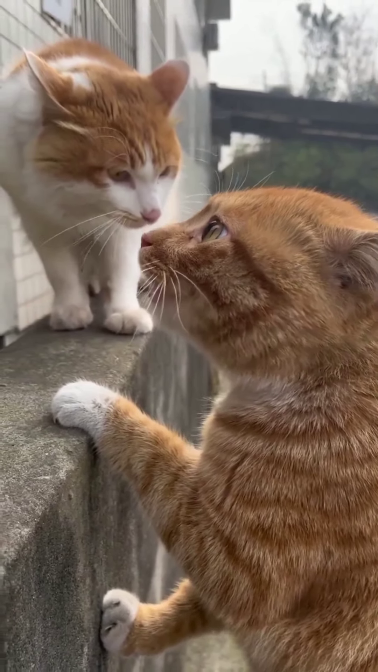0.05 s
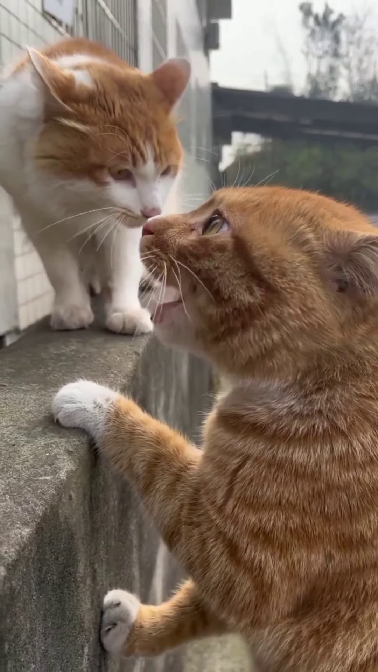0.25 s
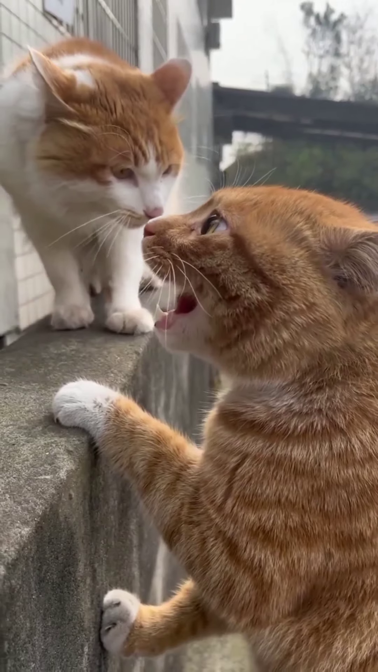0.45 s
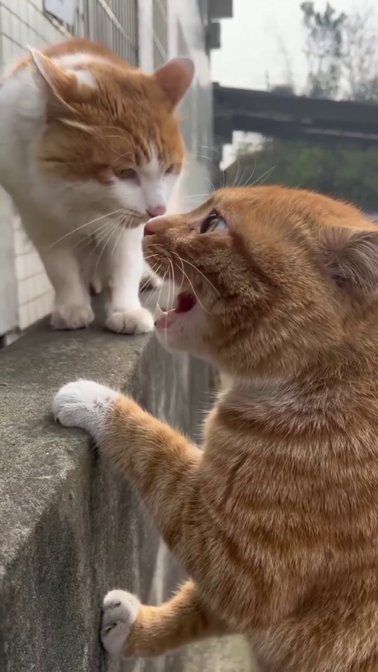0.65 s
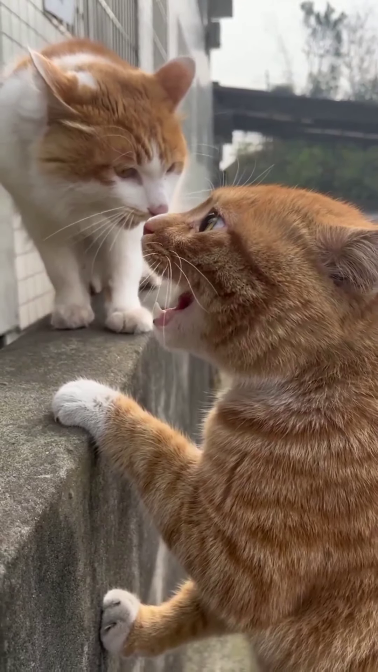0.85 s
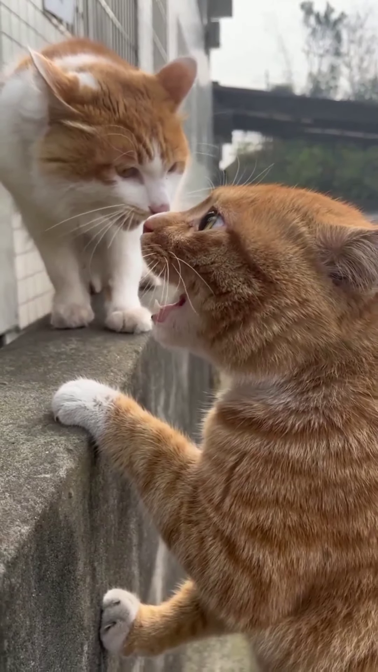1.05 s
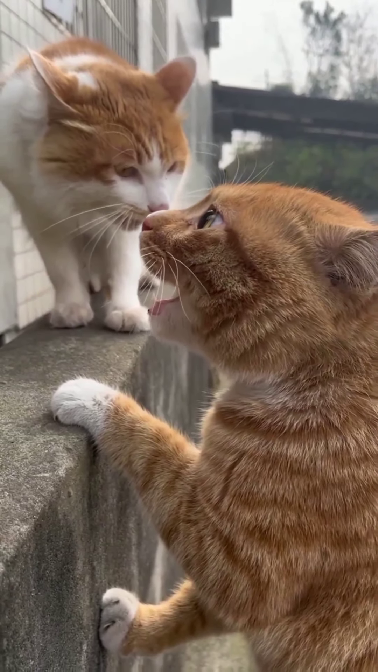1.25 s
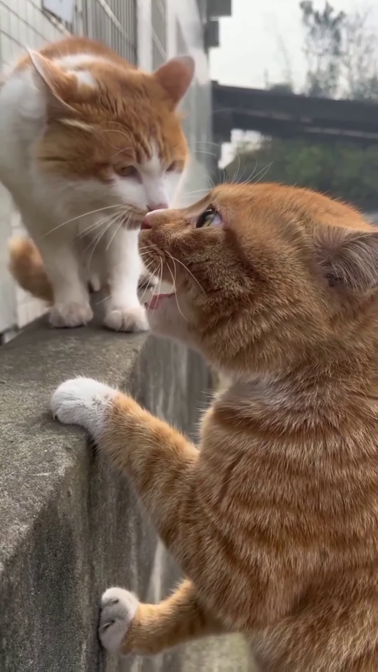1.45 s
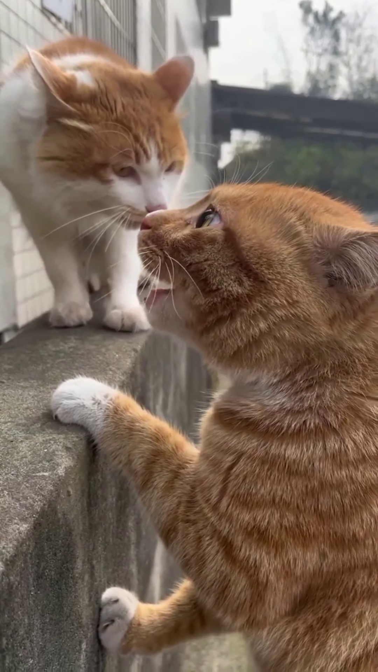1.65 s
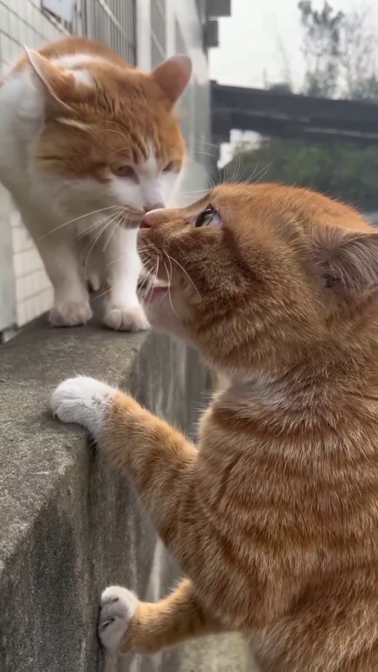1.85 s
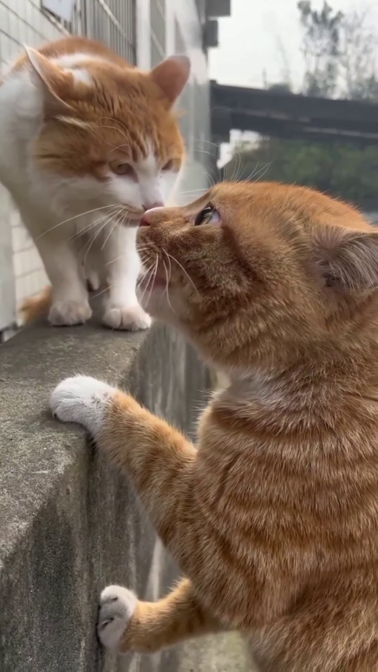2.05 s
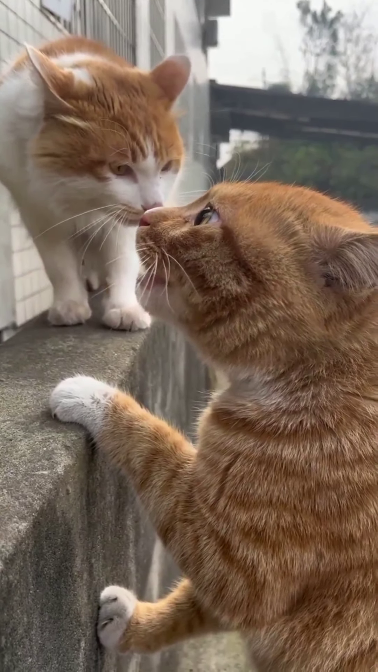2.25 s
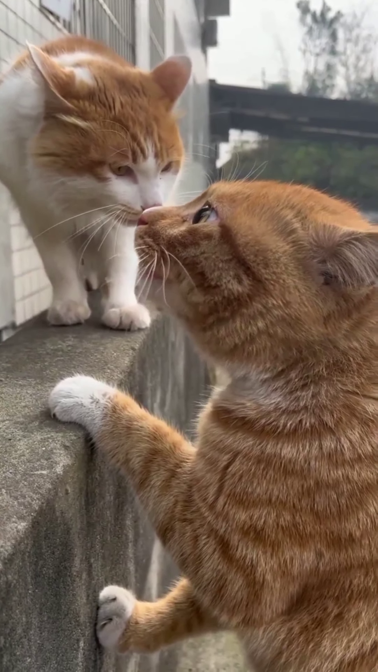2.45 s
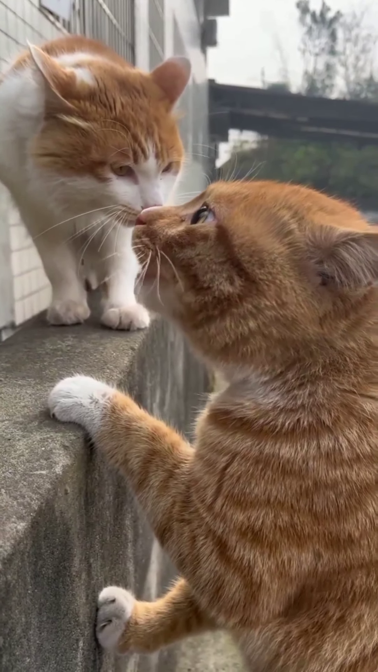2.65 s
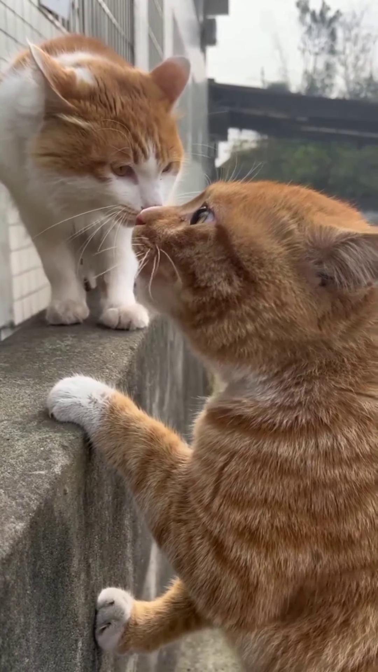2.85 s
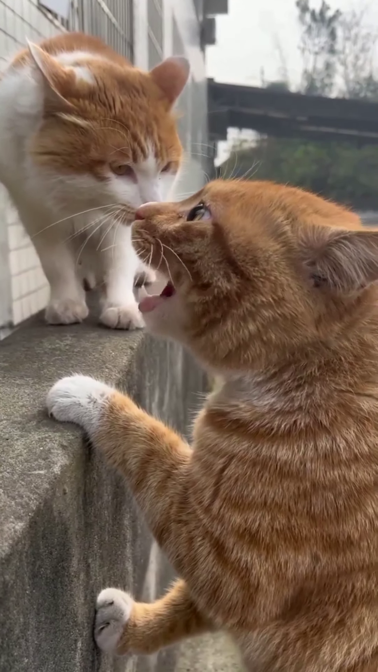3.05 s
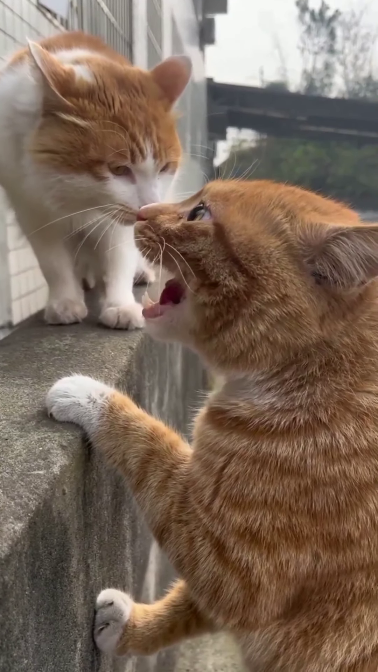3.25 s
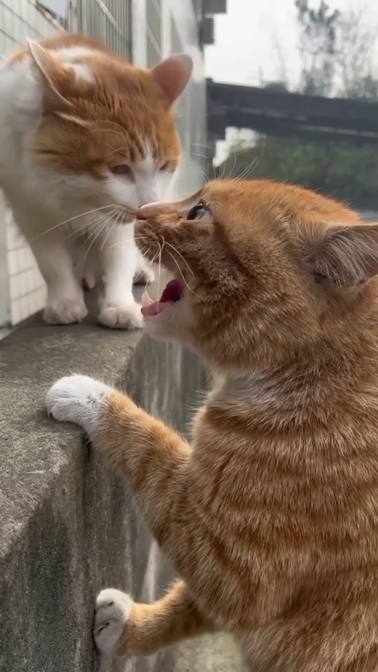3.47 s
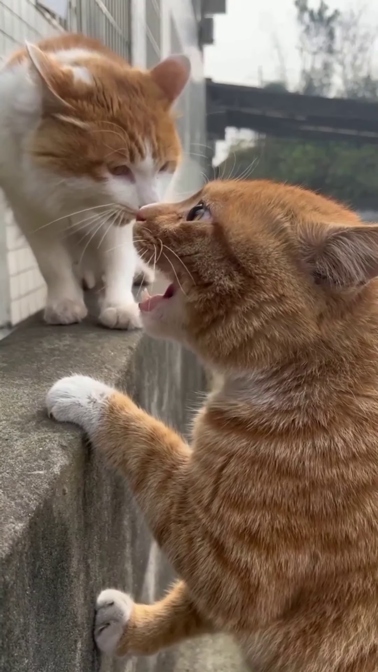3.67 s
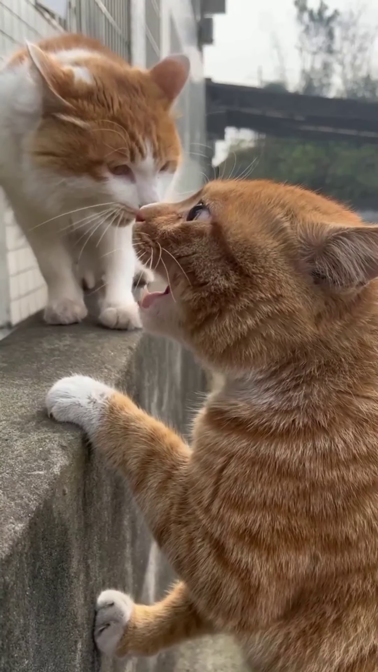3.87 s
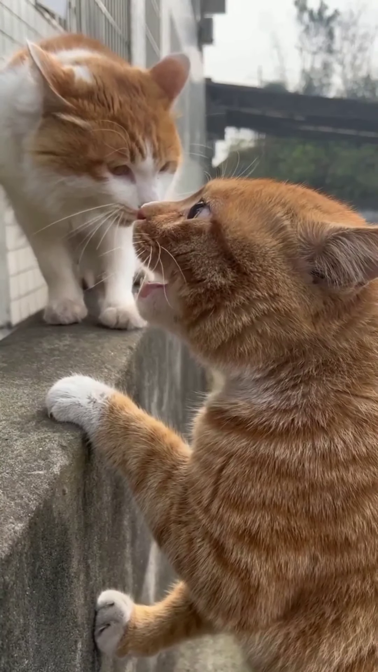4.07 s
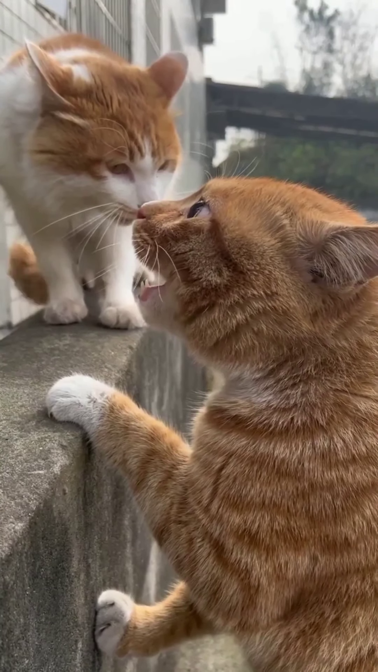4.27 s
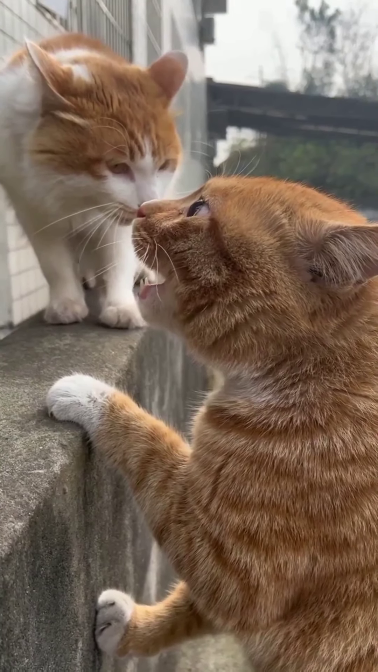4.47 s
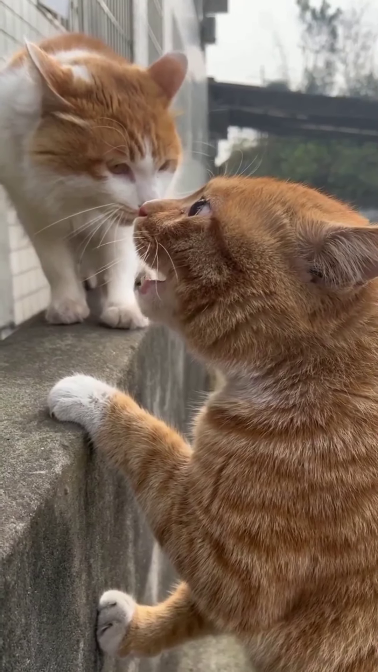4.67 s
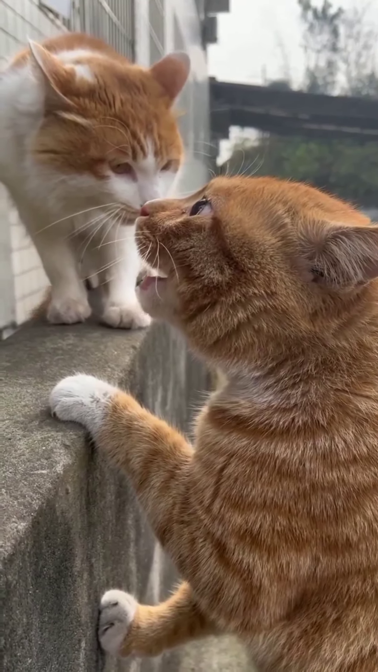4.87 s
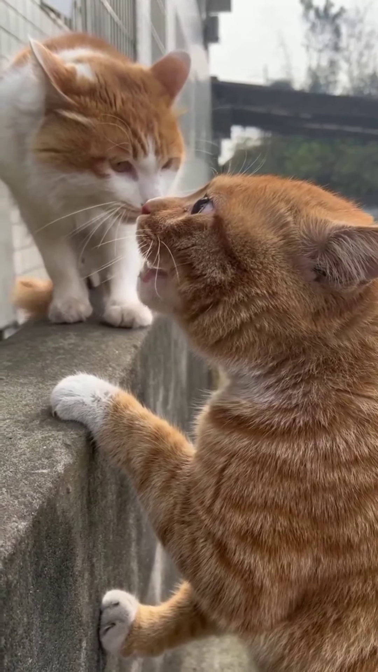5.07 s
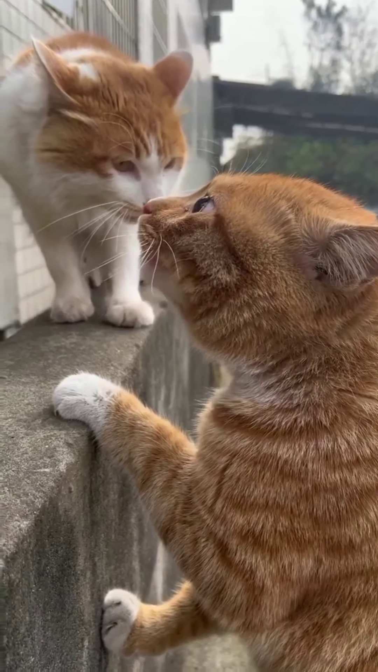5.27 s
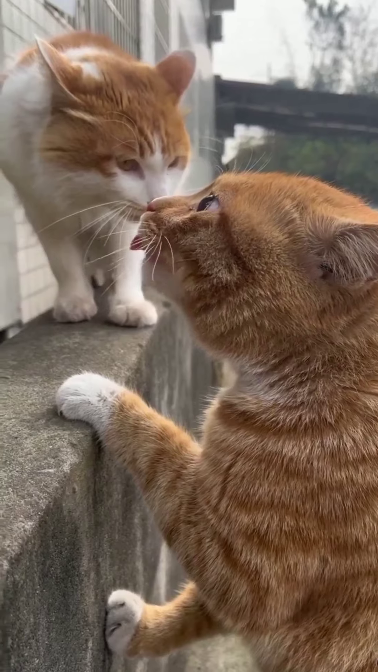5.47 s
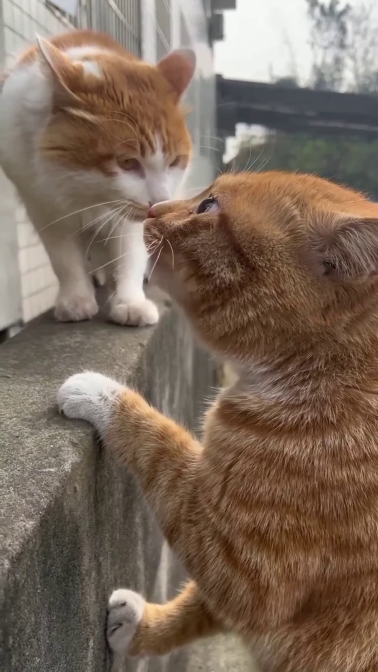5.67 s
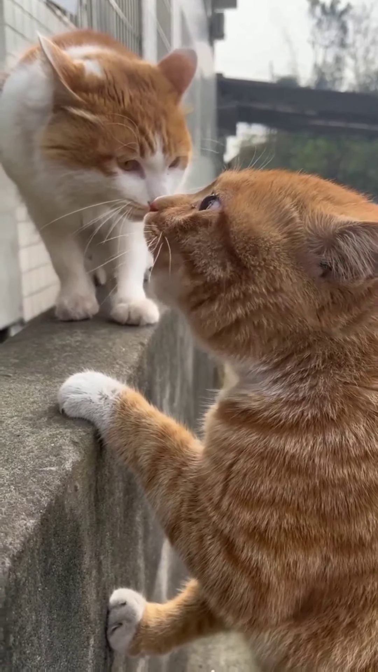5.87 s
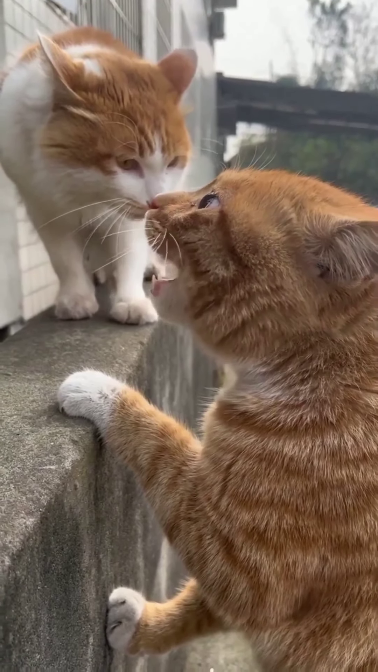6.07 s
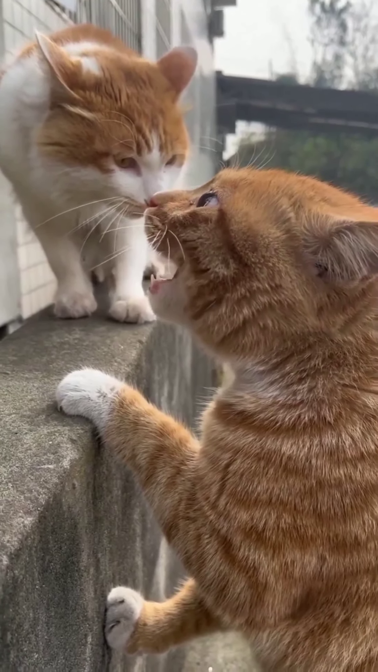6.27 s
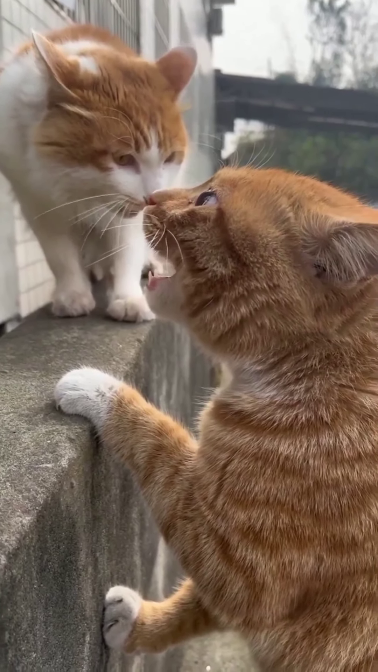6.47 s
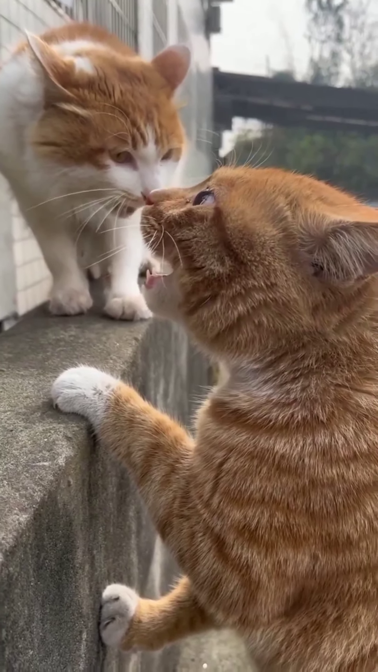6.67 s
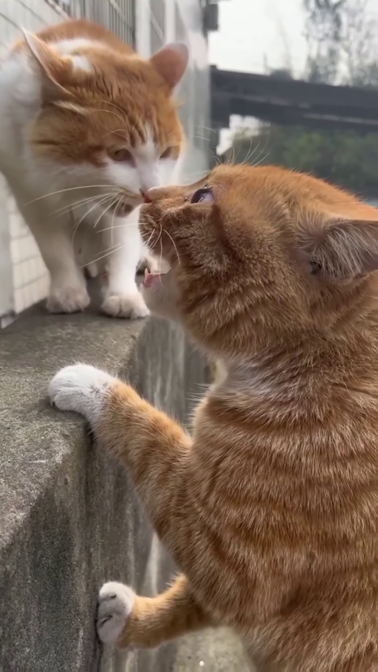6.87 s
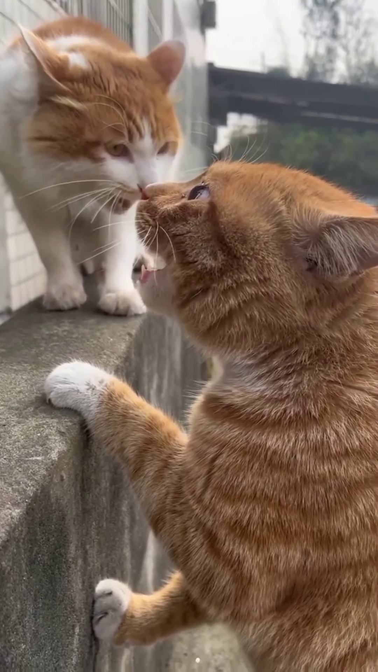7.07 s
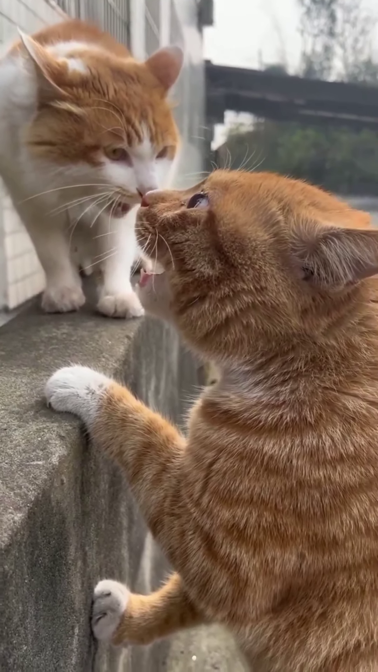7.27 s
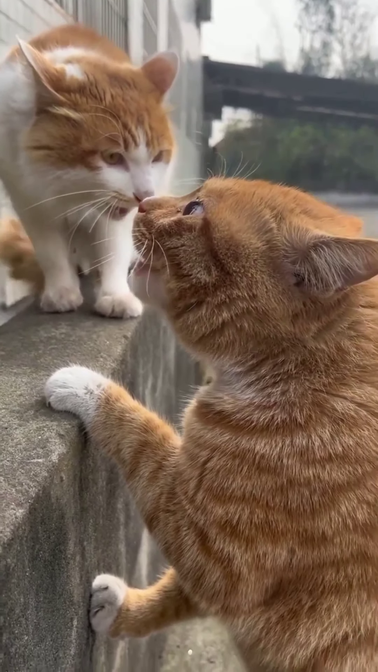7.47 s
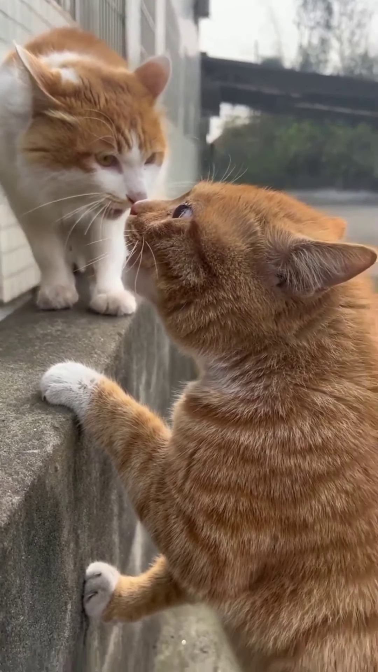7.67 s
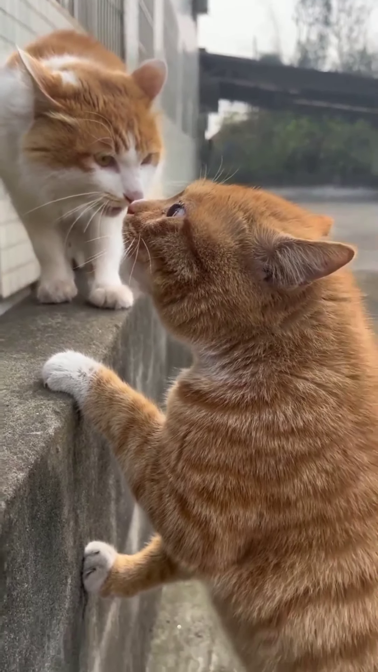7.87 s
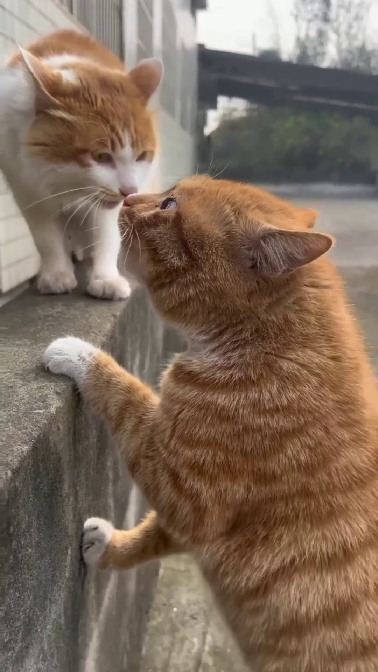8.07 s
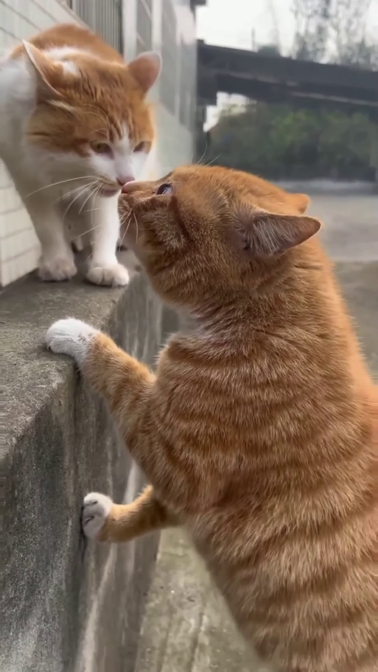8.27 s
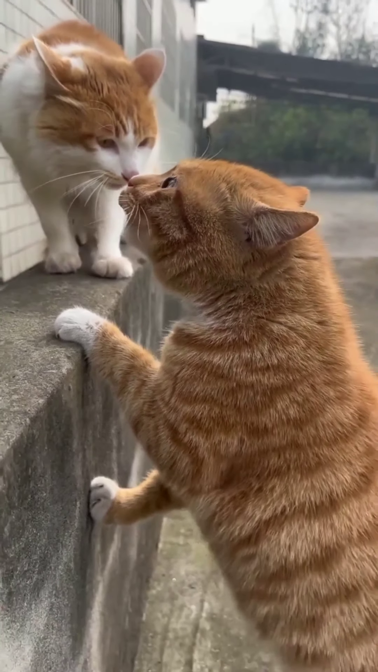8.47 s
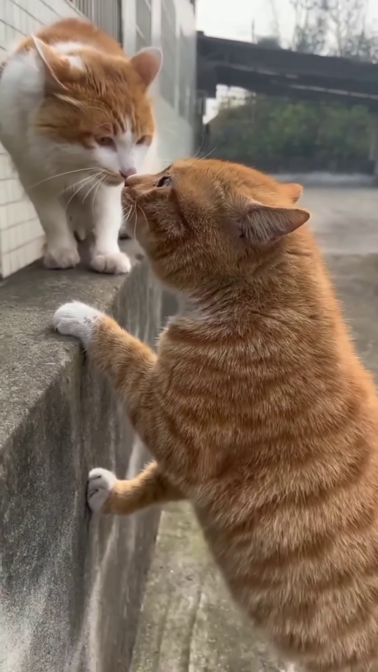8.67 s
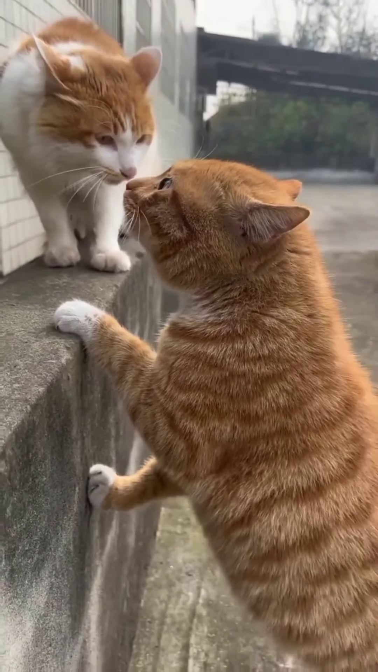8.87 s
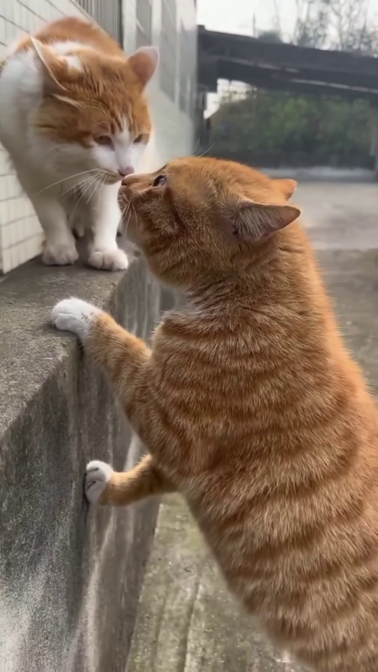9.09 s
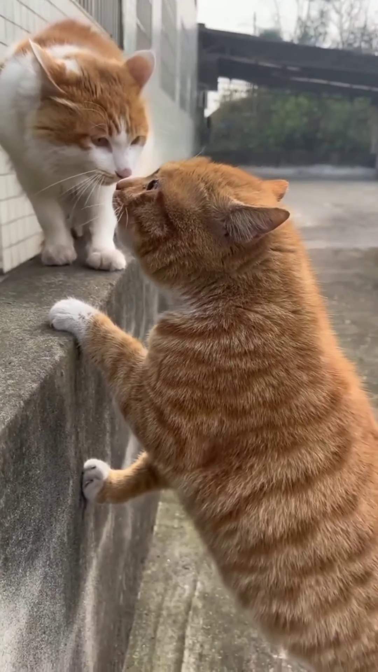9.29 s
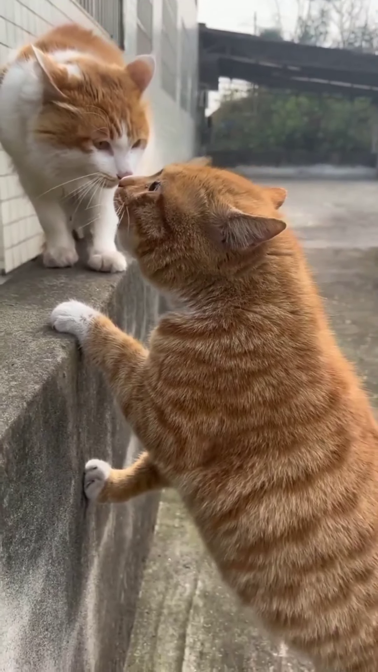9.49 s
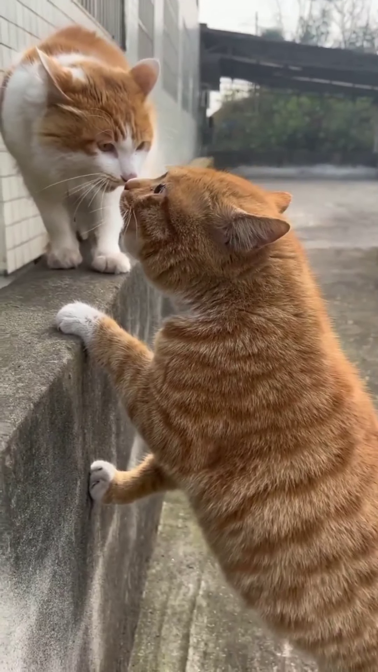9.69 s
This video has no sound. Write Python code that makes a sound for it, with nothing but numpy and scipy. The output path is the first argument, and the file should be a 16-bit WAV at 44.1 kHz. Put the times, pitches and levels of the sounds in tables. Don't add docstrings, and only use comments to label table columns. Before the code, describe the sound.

Overlapping cat yowls, tonal and vowel-like, moving from closed to wide open and back. A strong, lower near voice leads each of three rounds and a thinner, higher far voice answers over it, both sliding downward at the end. After a pause with small dry claw clicks, two new rising cries start and are cut off. Close phone pickup in an open yard, faint wall reflections, quiet town rumble and engine drone.

```python
import sys
import numpy as np
from scipy import signal
from scipy.fft import rfft, irfft, next_fast_len
from scipy.io import wavfile
from scipy.ndimage import uniform_filter1d

SR = 44100
rng = np.random.default_rng(int(sys.argv[2]) if len(sys.argv) > 2 else 0)


def voltage_ratio(decibels):
    exponent = np.asarray(decibels, float) / 20
    return 10 ** exponent


def store_wav(level_fs):
    pcm = np.round(np.clip(np.atleast_2d(level_fs), -1, 1) * 32767)
    wavfile.write(sys.argv[1], SR, pcm.T.astype(np.int16))


N = 429093
STEP = 32


def walk(turns_hz, count):
    x = rng.standard_normal(count)
    x = signal.sosfilt(signal.butter(2, turns_hz, fs=SR / STEP, output="sos"), x)
    return x / x.std()


def on_log(hz, table, column=1):
    table = np.array(table)
    return np.interp(np.log(np.maximum(hz, 1)), np.log(table[:, 0]), table[:, column])


def band(lo_hz, hi_hz):
    x = rng.standard_normal(N)
    x = signal.sosfilt(signal.butter(2, [lo_hz, hi_hz], "band", fs=SR, output="sos"), x)
    return x / x.std()


# start_s, drone_hz, drone_db, rumble_db, upper_rumble_db
TOWN_LEVELS = [
    (0.0, 51.0, -65.5, -57.5, -49.5),
    (0.431, 51.6, -65, -55, -54),
    (1.139, 44.7, -52.5, -56.5, -58),
    (3.599, 45.1, -60, -55.5, -62.5),
    (9.73, 59.4, -53, -57.5, -63),
]
# freq_hz, level_db_per_hz
AIR_COLOUR = [(140, -29), (240, -5), (335, -11.5), (812, -9), (1970, -21.5), (4390, -27), (13000, -37)]


def town():
    start_s, *columns = np.transpose(TOWN_LEVELS)
    t = np.arange(N) / SR
    drone_hz, drone_db, low_db, upper_db = (np.interp(t, start_s, c) for c in columns)
    pitch_sway, drone_sway, low_sway = [
        np.repeat(walk(turns_hz, N // STEP + 1), STEP)[:N] for turns_hz in (3., 4., 6.)]

    phase = 2 * np.pi * np.cumsum(drone_hz * (1 + 0.016 * pitch_sway)) / SR
    drone = np.sin(phase) + voltage_ratio(-13.5) * np.sin(2 * phase)
    drone = voltage_ratio(drone_db + 2.5 + 1.5 * drone_sway) * drone
    low = voltage_ratio(low_db + 2.0 * low_sway) * band(42, 97) + voltage_ratio(upper_db) * band(55, 250)

    freqs_hz = np.arange(N // 2 + 1) * SR / N
    air_gain = voltage_ratio(on_log(freqs_hz, AIR_COLOUR)) * (freqs_hz > 240)
    air = irfft(rfft(rng.standard_normal((2, N))) * air_gain, N)
    side = voltage_ratio(upper_db - 23.5) * band(150, 300) + voltage_ratio(low_db - 27.0) * band(35, 110)
    side = side * np.array([[1], [-1]])
    return drone + low + side + voltage_ratio(-69 + 2.0) * air / air.std()


# start_s, peak_db, pitch_hz
CLAW_TICKS = [
    (7.781, -53.5, 5500),
    (7.994, -55, 5400),
    (8.069, -62, 5260),
    (8.589, -55, 1210),
    (8.926, -60.5, 7900),
    (8.951, -75, 7020),
    (9.455, -47.5, 5500),
    (9.55, -50, 5270),
]


def claws():
    out = np.zeros((2, N))
    t = np.arange(800) / SR
    for start_s, peak_db, pitch_hz in CLAW_TICKS:
        burst = rng.standard_normal((2, len(t))) * np.exp(-t / 0.0049)
        edges_hz = [pitch_hz * 0.75, pitch_hz * 1.3]
        burst = signal.sosfilt(signal.butter(1, edges_hz, "band", fs=SR, output="sos"), burst)
        first = int(start_s * SR)
        out[:, first:first + len(t)] += voltage_ratio(peak_db) * burst / abs(burst).max()
    return out


def wall(x, t60_s=0.97, wet_db=-42, dull_hz=3000):
    t = np.arange(SR // 2) / SR
    decay = np.exp(-np.log(1000) * t / t60_s) * (t > .008)
    tail = rng.standard_normal((2, len(t))) * decay
    tail = signal.sosfilt(signal.butter(1, dull_hz, fs=SR, output="sos"), tail)
    tail = tail / np.sqrt(np.sum(tail ** 2) / 2)
    return voltage_ratio(wet_db) * signal.fftconvolve(x[None], tail, axes=1)[:, :N]


# freq_hz, level_db, lead_rad
PORT_SHADOW = [(150, 0, 0), (310, -2, -.6), (500, -6, -1.1), (630, -10, -1.1), (750, -11, -1.1),
               (850, -22, -.4), (960, -8, .4), (1250, -10, .1), (1380, -6, 0), (1600, -5, -1.2),
               (1940, 1, 1), (2450, 2, 1.9), (2740, -6, 2.6), (3000, -2, 2.3), (4600, -1, 1.7),
               (6000, 0, 3.1), (7700, 0, 6.2), (12000, 0, 8.4)]


def ports(x):
    size = next_fast_len(N + 8192)
    hz = np.arange(size // 2 + 1) * SR / size
    shadow = voltage_ratio(on_log(hz, PORT_SHADOW)) * np.exp(1j * on_log(hz, PORT_SHADOW, column=2))
    left = irfft(rfft(x, size) * shadow, size)[:N]
    return np.array([left, x])


def resonance(hz, centre_hz, sharp):
    r = hz / centre_hz
    return 1 / (1 - r * r + 1j * r / sharp)


def controls(t, pitch, mouth, start, steps, law):
    below, rise_s, roundness, tongue = start
    hz = np.interp(t, *np.transpose(pitch))
    hz = hz * (1 - below * np.exp(-((t - t[0]) / rise_s) ** roundness))
    for step_s, share in steps:
        flip = np.clip((t - step_s) / .012 + .5, 0, 1)
        hz = hz * (1 + share * (step_s > t[0]) * flip)
    point_s, effort_db, jaw_hz = np.transpose(mouth)
    effort_db, jaw_hz = np.interp(t, point_s, effort_db), np.interp(t, point_s, jaw_hz)
    tongue_hz = tongue * on_log(jaw_hz, law)
    slope_db, hollow_db = on_log(jaw_hz, law, column=2), on_log(jaw_hz, law, column=3)
    return hz, effort_db, jaw_hz, tongue_hz, slope_db, hollow_db


# low_hz, high_hz, level_db re effort
TEETH_HISS = [
    (4300, 5600, -39),
    (7500, 8000, -54.5),
    (11200, 13300, -46.5),
]


def cat(voice, head, jaw_sharp, tongue_sharp, waver, breath_db, flutter_db, pocket):
    out = np.zeros(N)
    *yowls, steps, law = voice
    for pitch, mouth, start in zip(*yowls):
        start_s, end_s = pitch[0][0], pitch[-1][0]
        span = np.arange(int(start_s * SR), min(int(end_s * SR), N))
        coarse = span[::STEP]
        count = len(coarse)
        hz, effort_db, jaw_hz, tongue_hz, slope_db, hollow_db = controls(
            coarse / SR, pitch, mouth, start, steps, law)
        catch_db = 7.5 * np.exp(-((coarse - span[0]) / SR / 0.14) ** 2)
        rasp_db = breath_db + catch_db
        hz = uniform_filter1d(hz, size=13, mode="nearest") * (1 + waver * walk(25, count))
        phase = 2 * np.pi * np.cumsum(np.interp(span, coarse, hz)) / SR
        edges = np.minimum(span - span[0], (end_s * SR - span) / 4.)
        edges = np.clip(edges / (0.0023 * SR), 0, 1)

        for lo_hz, hi_hz, hiss_db in TEETH_HISS:
            db = effort_db + catch_db + hiss_db + 2.5 * walk(36, count)
            out[span] += edges * np.interp(span, coarse, voltage_ratio(db)) * band(lo_hz, hi_hz)[span]

        for k in range(1, 27):
            f = k * hz
            db = effort_db + slope_db * np.log2(k) + on_log(f, head)
            db = db + flutter_db * k ** 0.5 * walk(8.7, count)
            db = db + hollow_db * np.exp(-((f / jaw_hz - .745) / .1) ** 2)
            gain = voltage_ratio(db) * resonance(f, jaw_hz, jaw_sharp) * resonance(f, tongue_hz, tongue_sharp)
            between_hz = np.sqrt(jaw_hz * tongue_hz)
            gain = gain * resonance(f, between_hz, 0.81) / resonance(f, between_hz, pocket)
            breath = walk(100, count) + 1j * walk(110, count)
            gain = gain * (1 + voltage_ratio(rasp_db) * np.sqrt(k) * breath)
            gain = np.interp(span, coarse, gain.real) + 1j * np.interp(span, coarse, gain.imag)
            out[span] -= np.sqrt(2) * edges * (gain * np.exp(1j * k * phase)).real
    return out


# freq_hz, level_db
FAR_COLOUR = [(300, 8.5), (520, 0.14), (1000, 2.5), (1500, 2), (1880, -6.5), (2400, -5.5), (3100, 1),
              (3700, -6), (4200, 9.5), (4900, 15.5), (5900, 33.5), (6900, 18), (8400, 9), (11000, 32)]
# time_s, pitch_hz
FAR_HELD = [
    [(.5, 617.5), (1.08, 594.7), (1.5, 550), (1.59, 524), (1.71, 514.2), (2.07, 480), (2.41, 388.8),
     (2.66, 370.7), (2.76, 347)],
    [(3.36, 608.2), (3.74, 602.2), (3.96, 543), (4.18, 512), (4.33, 472), (4.92, 455.7), (5.29, 376.8),
     (5.5, 366.2), (5.83, 265)],
    [(6.3, 601.8), (6.6, 600), (6.91, 626), (7.13, 630), (7.35, 620), (7.66, 576.4), (7.8, 494),
     (8.1, 436.7), (8.26, 351)],
    [(9.03, 475.8), (9.36, 480), (9.45, 505), (9.59, 595), (9.8, 620)],
]
# time_s, effort_db, jaw_hz
FAR_JAW = [
    [(.5, -43.5, 1026), (.54, -40, 1027), (.72, -35, 1250), (.84, -31.5, 1074), (1.16, -32.5, 1070),
     (1.27, -33, 1244), (1.5, -38, 1223), (2.07, -38, 827), (2.76, -48, 648)],
    [(3.36, -45, 842), (3.4, -37.5, 840), (3.6, -32.5, 1243), (3.9, -34.5, 1215), (4.01, -36.5, 1058),
     (4.36, -41, 1086), (4.89, -41, 950), (5.05, -38, 748), (5.8, -50.5, 842)],
    [(6.3, -42.5, 1003), (6.45, -35, 1080), (6.6, -33, 1069), (6.75, -30.5, 1480), (6.91, -27, 1630),
     (7.55, -31.5, 1504), (7.86, -41, 1053), (8.1, -39, 970), (8.25, -54, 866)],
    [(9.03, -52, 855), (9.13, -40, 813), (9.36, -39, 750), (9.49, -36, 1130), (9.69, -33, 1536)],
]
# below_share, rise_s, roundness, tongue_factor
FAR_SCOOPS = [
    (.3, .16, 1.5, 0.82),
    (0.32, 0.14, 1.2, 0.82),
    (0.23, .09, 1.6, 0.8),
    (0.25, 0.046, 0.77, 0.76),
]
# time_s, pitch_share
FAR_FLIPS = [
    (3.985, .1),
]
# jaw_hz, tongue_hz, fold_slope_db_per_octave, hollow_db
FAR_THROAT = [(620, 3000, -5, -.1), (850, 2570, -3.5, -0.36), (1080, 3250, -1.5, -.3),
              (1250, 2800, -2.5, -.4), (1480, 3600, -6, -0.5)]


def far_cat():
    voice = FAR_HELD, FAR_JAW, FAR_SCOOPS, FAR_FLIPS, FAR_THROAT
    return cat(voice, FAR_COLOUR, 4.2, 5.7, waver=0.0026, breath_db=-33.0, flutter_db=1.26, pocket=2.3)


# freq_hz, level_db
NEAR_COLOUR = [(300, -3.2), (520, -7.3), (1000, 4.3), (1500, 2.2), (1880, -3.9), (2400, 1.9), (3100, 4.4),
               (3700, 0.3), (4250, -16), (5000, 17), (5950, -2), (6900, 20), (8400, 23.5), (11000, 16.4)]
# time_s, pitch_hz
NEAR_HELD = [
    [(0.0, 517.5), (.34, 531), (.71, 539.2), (.99, 534), (1.3, 494), (1.45, 462.8), (1.82, 424.5),
     (2.07, 349.6), (2.16, 298)],
    [(2.76, 500), (2.94, 497), (3.12, 538), (3.42, 540.1), (3.97, 494.3), (4.34, 501.6), (4.57, 473.3),
     (4.73, 444.6), (5.1, 355)],
    [(5.74, 500.2), (5.95, 498.6), (6.09, 514.3), (6.29, 516.3), (6.8, 513.8), (7.18, 499.2), (7.31, 473.8),
     (7.44, 413), (7.73, 310)],
    [(9.34, 455), (9.8, 471)],
]
# time_s, effort_db, jaw_hz
NEAR_JAW = [
    [(0.0, -30, 840), (.06, -27, 956), (.22, -29, 1746), (.34, -28.5, 2013), (.96, -27.5, 1767),
     (1.02, -30.5, 1552), (1.45, -25.5, 1166), (1.9, -26, 790), (2.16, -35.5, 660)],
    [(2.76, -39, 850), (2.8, -28, 908), (2.9, -28.5, 1483), (3.04, -27.5, 2180), (3.44, -30, 2120),
     (3.85, -30.5, 1438), (4.5, -30, 1435), (4.8, -28.5, 865), (5.09, -33, 708)],
    [(5.74, -45.5, 648), (5.8, -28, 813), (5.92, -32.5, 1450), (6.09, -33, 1826), (6.29, -32.5, 1750),
     (7.18, -30, 1536), (7.43, -30, 792), (7.58, -33.5, 743), (7.72, -42.5, 675)],
    [(9.34, -42, 797), (9.38, -34, 825), (9.48, -26, 898), (9.69, -29, 1174)],
]
# below_share, rise_s, roundness, tongue_factor
NEAR_SCOOPS = [
    (.36, 0.054, 1.05, 1.053),
    (.38, .055, 2.6, 0.9985),
    (0.3, 0.076, 1.3, 0.924),
    (.42, .12, 1.2, .72),
]
# time_s, pitch_share
NEAR_FLIPS = [
    (0.202, -0.024),
    (0.998, .02),
    (1.928, 0.12),
    (2.924, -0.011),
    (5.93, -0.026),
    (7.46, .16),
]
# jaw_hz, tongue_hz, fold_slope_db_per_octave, hollow_db
NEAR_THROAT = [(660, 3400, -14, 3.3), (796, 2100, -6, 4.5), (1182, 2420, -5.5, 3), (1450, 2418, -3.5, 2),
               (2270, 3282, -3, -10.5)]


def near_cat():
    voice = NEAR_HELD, NEAR_JAW, NEAR_SCOOPS, NEAR_FLIPS, NEAR_THROAT
    return cat(voice, NEAR_COLOUR, 8.2, 12.7, waver=0.0027, breath_db=-40, flutter_db=1.0, pocket=2.21)


def scene():
    cats = near_cat() + far_cat()
    return town() + claws() + wall(cats) + ports(cats)


def low_pass(x):
    return signal.sosfilt(signal.butter(12, 13370, fs=SR, output="sos"), x)


def record(dry):
    return low_pass(dry)


dry = scene()
out = record(dry)
store_wav(out)
```